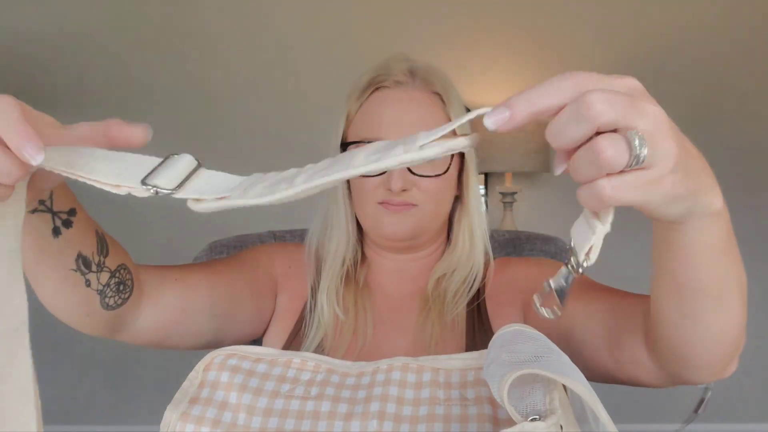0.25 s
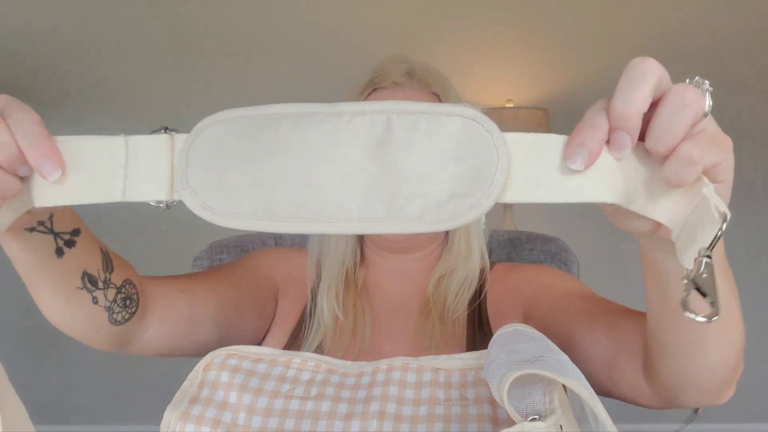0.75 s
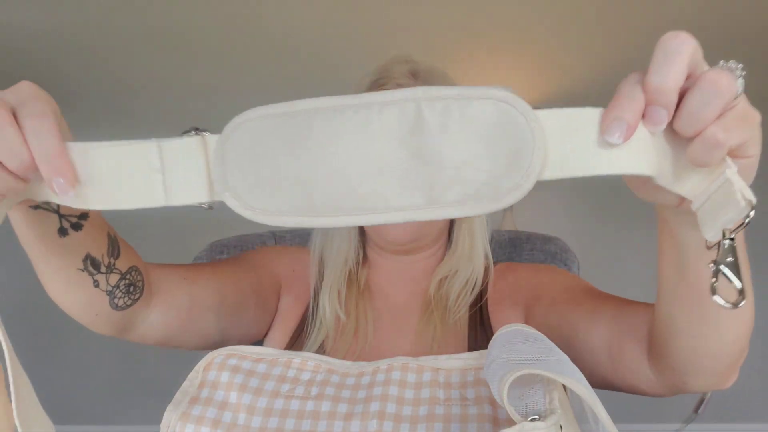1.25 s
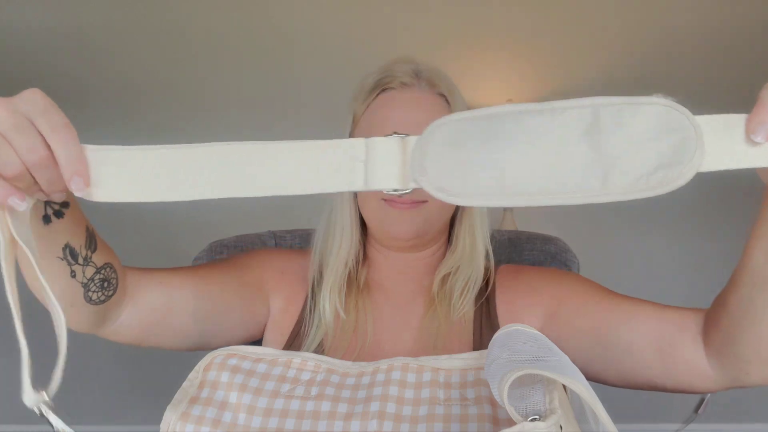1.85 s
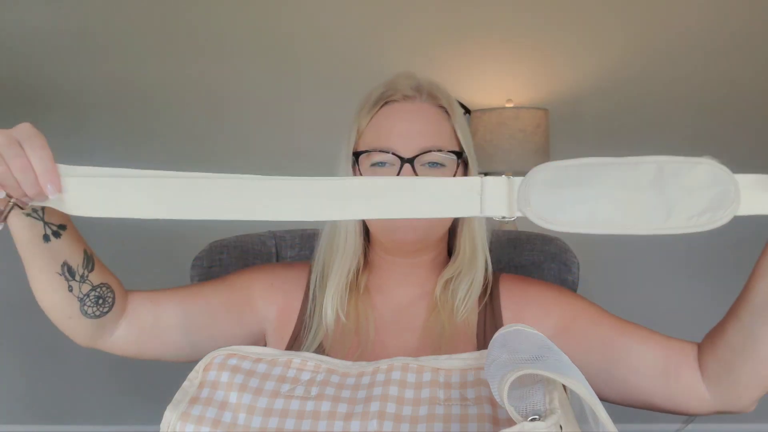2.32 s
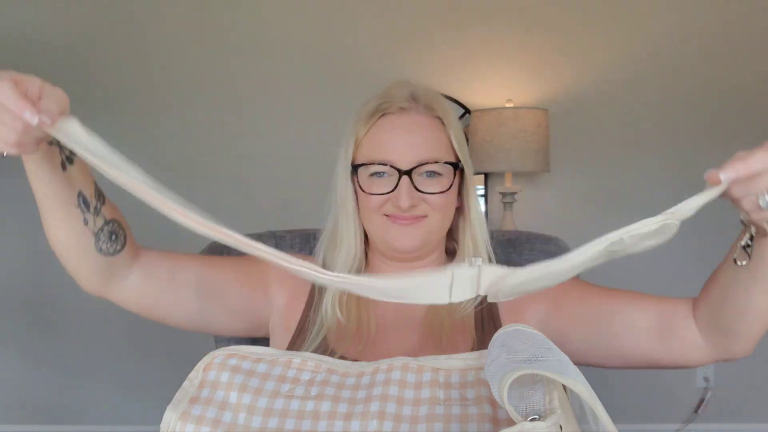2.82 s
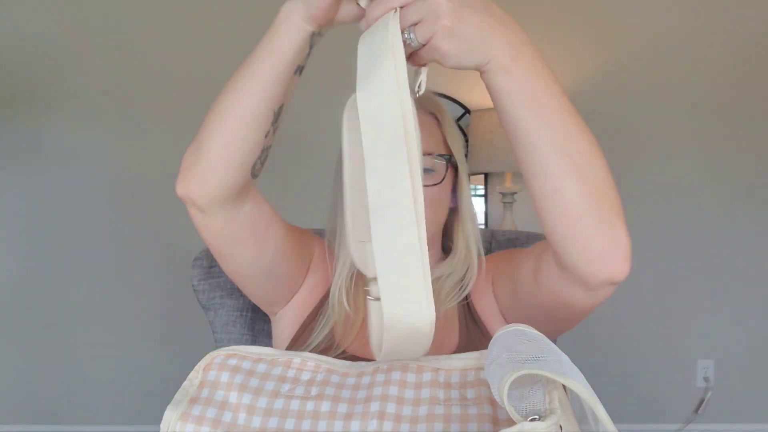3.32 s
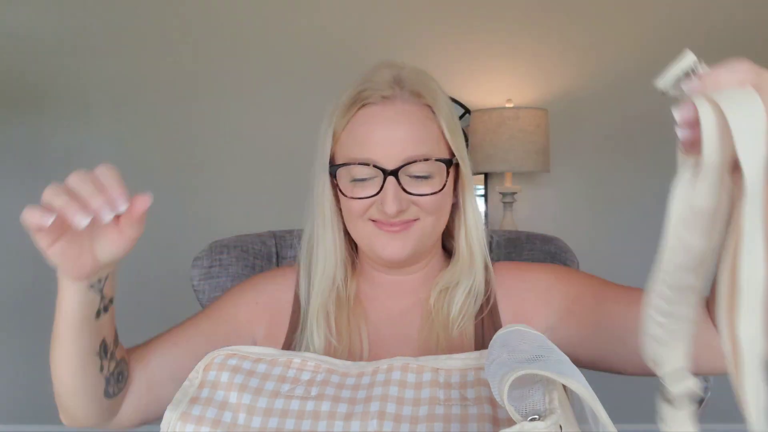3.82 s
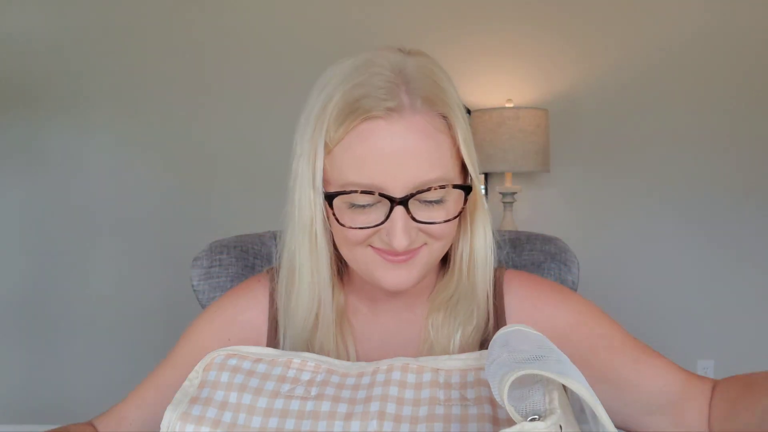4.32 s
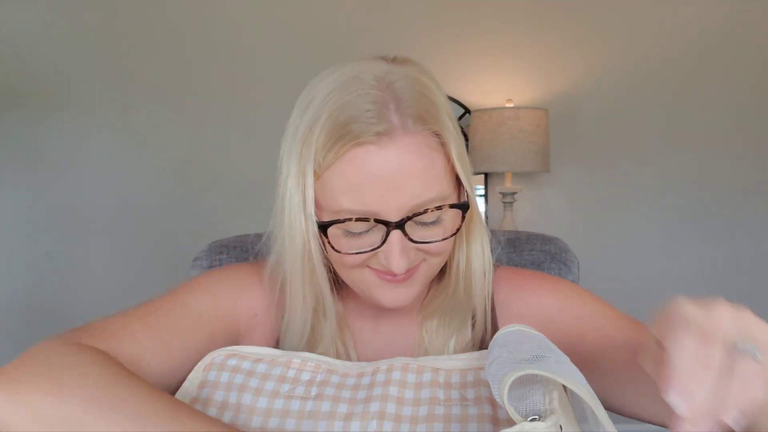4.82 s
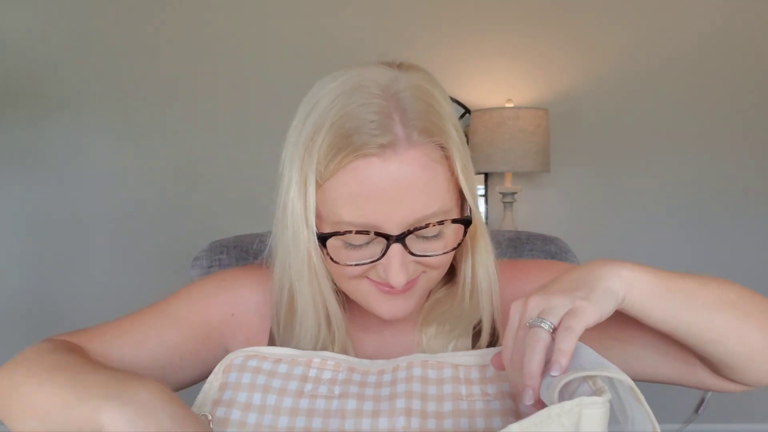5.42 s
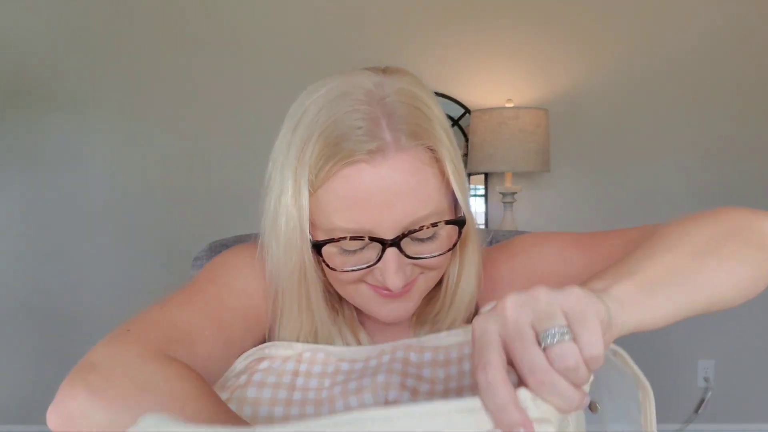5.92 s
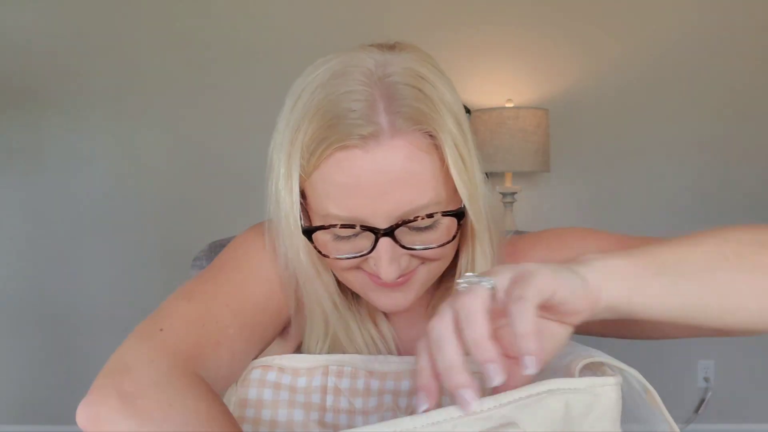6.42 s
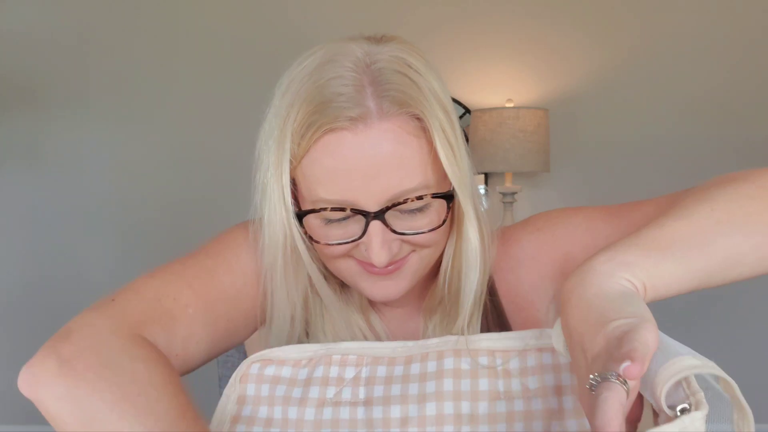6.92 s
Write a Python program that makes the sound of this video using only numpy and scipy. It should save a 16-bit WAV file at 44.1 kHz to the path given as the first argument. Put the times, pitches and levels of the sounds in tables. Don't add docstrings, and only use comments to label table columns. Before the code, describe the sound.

In a quiet room, a fabric strap slides with faint buckle ticks, drops with one violent metal-on-wood crack, then a bag is shoved about.

```python
import sys
import numpy as np
from scipy import signal
from scipy.fft import rfft, irfft, next_fast_len
from scipy.io import wavfile
from scipy.ndimage import map_coordinates

SR = 44100
rng = np.random.default_rng(int(sys.argv[2]) if len(sys.argv) > 2 else 0)


def magnitude_from_level(level_db):
    exponent = np.asarray(level_db, float) / 20
    return 10 ** exponent


def generate_wav(signal):
    frames = np.transpose(np.atleast_2d(signal))
    scaled = np.clip(frames, -1, 1) * 32767
    pcm = np.round(scaled).astype(np.int16)
    wavfile.write(sys.argv[1], SR, pcm)


N = 315315
SPAN = 32768
DETUNE = 0.012


def along(points, hz):
    f, v = np.transpose(points)
    return np.interp(np.log(hz + 1), np.log(f + 1), v)


def unit(x):
    return x / np.sqrt(np.mean(x ** 2) + 1e-20)


def causal(db):
    cepstrum = irfft(np.log(magnitude_from_level(np.maximum(db, -90))))
    half = cepstrum.shape[-1] // 2
    cepstrum[1:half] *= 2
    cepstrum[half + 1:] = 0
    return np.exp(rfft(cepstrum))


def pair(count, length):
    # f/Hz, correlation
    likeness = [(30, 0.94), (200, 0.9), (500, 0.86), (1000, 0.065), (2000, 0.049), (16000, .02)]
    hz = np.fft.rfftfreq(length, 1 / SR)
    angle = np.arccos(np.clip(along(likeness, hz), 0, 1)) / 2
    a, b = rfft(rng.standard_normal((2, count, length)))
    common, apart = a * np.cos(angle), b * np.sin(angle)
    return np.stack([common + apart, common - apart], axis=1)


def rush(spectrum, grain_db, grain_hz):
    length = next_fast_len(N)
    gain = magnitude_from_level(along(spectrum, np.fft.rfftfreq(length, 1 / SR)))
    noise = irfft(pair(count=1, length=length)[0] * gain, length)[:, :N]
    knots = np.minimum(rng.exponential(size=int(N * 1000 / SR)), 3.5)
    grain = np.interp(np.arange(N) * grain_hz / SR, np.arange(len(knots)), knots)
    return unit(noise * magnitude_from_level(grain_db * grain))


def strokes(rows):
    t = np.arange(N) / SR
    power = 0
    for s, db, swell, hold, fade in rows:
        rise = 20 * np.maximum(s - t, 0) / max(swell, 0.002)
        fall = 20 * np.maximum(t - s - hold, 0) / max(fade, 0.002)
        power = power + magnitude_from_level(db - rise - fall) ** 2
    return 10 * np.log10(power + 1e-14)


def crumpled(x, modes, depth_db, bins, frames, board_db):
    hz, _, z = signal.stft(x, SR, nperseg=512)
    grid = np.meshgrid(np.arange(len(hz)) / bins, np.arange(z.shape[2]) / frames, indexing="ij")
    patches = map_coordinates(rng.standard_normal(z.shape[1:]), grid, order=1)
    board = 1 + sum(magnitude_from_level(db + board_db) / (1 + ((hz - centre) / max(width, 60)) ** 2)
                    for centre, width, db in modes)
    return unit(signal.istft(z * board[:, None] * magnitude_from_level(depth_db * patches), nperseg=512)[1][:, :N])


def place(times, sounds, pan_db, lag_s, wet_db, size=SPAN):
    # f/Hz, t60/s
    wall_decay = [(100, 0.64), (500, 0.68), (2000, 0.66), (6000, 0.56), (9000, .4), (14000, 0.28)]
    hz = np.fft.rfftfreq(size, 1 / SR)
    band, t, z = signal.stft(irfft(pair(count=len(times), length=size)), SR, nperseg=256)
    swell = 1 - np.exp(-t / 0.0013)
    decay = magnitude_from_level(-60 * t / along(wall_decay, band)[:, None])
    tails = signal.istft(z * swell * decay, SR, nperseg=256)[1][..., :size]
    tails /= np.linalg.norm(tails, axis=-1, keepdims=True)
    side = np.array([[0.5], [-0.5]])
    out = np.zeros((2, N + size))
    for s, sound, pan, tail in zip(times, sounds, pan_db, tails):
        delay = np.exp(-2j * np.pi * hz * (0.000998 + side * lag_s))
        direct = magnitude_from_level(side * np.clip(pan, -8, 8)) * delay
        heard = irfft(rfft(sound, size) * (direct + magnitude_from_level(wet_db) * rfft(tail)))
        out[:, round((s - 0.001) * SR):][:, :size] += heard
    return out[:, :N]


def blow(colour, rise, t60, even, push=0):
    t = np.arange(SPAN // 4) / SR
    shape = (1 - np.exp(-t / rise)) * magnitude_from_level(-60 * t / max(t60, 0.002))
    z = rfft((push + rng.standard_normal(len(t))) * shape)
    burst = irfft(z / np.abs(z) ** even) * shape ** (even / 2)
    x = irfft(rfft(burst) * colour)
    return x / np.abs(x).max()


def ringing(modes, scatter_db):
    t = np.arange(SPAN // 2) / SR
    out = 0
    for hz, db, t60 in modes:
        decay = magnitude_from_level(db + scatter_db * rng.normal() - 60 * t / t60)
        out = out + decay * (1 - np.exp(-t * hz / 2.3)) * np.sin(2 * np.pi * hz * t)
    return out


def drops():
    # t/s, peak level/dB, brightness/dB, left-right/dB, deep ring/dB
    landings = [
        (4.686, -8, -0.5, -1, 3),
        (4.7328, -2.5, 5, -3, -3.5),
        (4.735, 0.5, 1.5, 2.5, -6),
        (4.742, -19.5, 2.5, -0.5, 6),
        (4.7521, -22, 6, -2.5, 1),
        (4.77, -22.5, 4.5, -8, -5.5),
        (4.806, -20.5, -7, -6, 3.5),
        (4.821, -36, -13, -7, 3),
    ]
    # f/Hz, level/dB per Hz
    crack_colour = [(60, -42.5), (150, -9), (330, -7.5), (720, -0.5), (1050, -6), (1300, -0.5), (1650, -4),
                    (2400, -3), (3400, -5), (4200, -8.5), (5900, -16), (6500, -41.5), (10500, -41.5),
                    (14000, -34.5)]
    # f/Hz, level/dB, t60/s
    desk_ring = [(167, -9, 0.12), (370.2, -12.5, 0.091), (545, -3.5, 0.065), (675, -10, 0.069),
                 (982, -7.5, 0.073), (1262, -5.5, 0.061), (1338, -16.5, 0.14), (2020, -20, 0.074),
                 (2174, -8, .07), (2425, -11.5, 0.047), (2558, -6, 0.044), (2806, -3.5, 0.047),
                 (3140, -12.5, 0.065), (4205, -11, 0.073)]
    f = np.fft.rfftfreq(SPAN // 4, 1 / SR)
    s, peak_db, bright_db, pan_db, deep_db = np.transpose(landings)
    sounds = []
    for db, bright, deep in zip(peak_db, bright_db, deep_db):
        modes = [(hz * (1 + DETUNE / 4 * rng.normal()), g + deep * (hz < 450), t60)
                 for hz, g, t60 in desk_ring]
        x = ringing(modes, scatter_db=1.5) / 4
        tilt = bright * np.log2(f / 2000 + 0.16)
        crack = blow(causal(along(crack_colour, f) + tilt), rise=0.00041, t60=0.0045, even=1.0)
        x[:len(crack)] += crack
        sounds.append(magnitude_from_level(db - 2.0) * x)
    return place(s, sounds, pan_db, lag_s=0.0003, wet_db=-2.5)


def knocks():
    # t/s, peak level/dB, brightness/dB, left-right/dB
    blows = [(0.07, -48.5, -10, -5.5), (0.09, -17, -14.5, 4), (0.12, -26.5, -22, 1),
             (0.214, -23.5, -20, -2.5), (0.255, -24, -16.5, 7.5), (.274, -32.5, -18, -10),
             (0.425, -38, -25, -2), (0.501, -49, -26.5, 25), (4.354, -57, -18, -1), (5.494, -53, 21, -8),
             (6.286, -37.5, -2, 11), (6.307, -35, -17, 5), (6.325, -36, -1, -4), (6.359, -35, 19, 1),
             (6.835, -43, -13, -2), (6.868, -45.5, -14, 0), (6.907, -39.5, -12, 1), (7.005, -38, -8, 0),
             (7.049, -50, -20, -3)]
    # f/Hz, width/Hz, level/dB
    desk_modes = [(375, 25.3, -0.5), (558, 25, -3.5), (655, 41.6, -9.5), (935, 56, -2.5), (1160, 54, -5.5),
                  (1379, 71, -5.5), (2010, 99, -22.5), (2310, 43, -23.5), (2875, 610, -31),
                  (3680, 45, -11.5), (4180, 130, -17.5), (5260, 550, -15.5)]
    f = np.fft.rfftfreq(SPAN // 4, 1 / SR)
    s, peak_db, bright_db, pan_db = np.transpose(blows)
    padded = 1 / (1 + 1j * f / 2700) ** 3
    sounds = []
    for db, bright in zip(peak_db, bright_db):
        wood = 0
        for k, (hz, w, g) in enumerate(desk_modes):
            c = hz * (1 + DETUNE * rng.normal())
            lift = (bright + 18) * np.clip(np.log2(c / 900), -0.5, 1.2)
            gain = (-1) ** k * magnitude_from_level(g + 1.5 * rng.normal() + lift)
            wood = wood + gain * 1j * f * w / (c * c - f * f + 1j * f * w)
        sounds.append(magnitude_from_level(db + 2.5) * blow(wood * padded, rise=0.00016, t60=0.0014, even=1.0, push=2.5))
    return place(s + 0.0015, sounds, pan_db, lag_s=0.00005, wet_db=-13)


def bumps():
    # t/s, peak level/dB, f/Hz, t60/s, left-right/dB
    thuds = [(0.094, -36, 94, 0.14, 2), (0.43, -53, 388.6, .06, 5), (4.6097, -45, 560, .022, 2),
             (6.946, -34, 436, 0.064, 0), (7.076, -53, 332.6, 0.016, -4), (0.501, -39, 393, 0.035, -6),
             (2.338, -57.5, 1900, 0.046, -6), (4.736, -37.5, 91, 0.32, 3), (5.492, -26, 305, 0.021, 1),
             (5.643, -51.5, 478, 0.071, 0.5), (5.84, -39, 232, 0.032, 1), (6.31, -59, 405, 0.052, -0.5),
             (6.353, -24, 145, 0.044, 5), (6.598, -36, 327, 0.041, 0), (6.618, -34.5, 523, 0.024, 4),
             (6.684, -41, 141, 0.046, 1), (6.76, -32, 473, 0.031, 2), (6.936, -47, 510, 0.13, 9),
             (6.962, -41.5, 464, 0.16, -8), (7, -33.5, 360, 0.07, -3), (7.001, -23.5, 79, 0.036, 0),
             (7.019, -39, 377, 0.16, -5), (7.049, -32, 310, 0.038, -12)]
    s, peak_db, pitch_hz, t60, pan_db = np.transpose(thuds)
    sounds = []
    for db, hz, decay in zip(peak_db, pitch_hz, np.maximum(t60, 0.015)):
        modes = [(hz, db + 2.0, decay), (hz * 1.9, db - 6, decay * 0.46), (75, db - 9.0, 0.07)]
        sounds.append(ringing(modes, scatter_db=6.5))
    return place(s, sounds, pan_db, lag_s=0.00002, wet_db=-13)


def clicks(rows, t60, top_db, wet_db):
    f = np.fft.rfftfreq(SPAN // 4, 1 / SR)
    s, peak_db, centre_hz, pan_db, sparkle_db = np.transpose(rows)
    sounds = []
    for db, hz, sparkle in zip(peak_db, centre_hz, sparkle_db):
        top = top_db + sparkle
        shape = [(900, -50), (1900, -24), (hz * 0.6, -19), (hz * 0.88, -8), (hz, 0), (hz * 1.1, -8),
                 (9600, top + 0.5), (11200, top + 0.532), (12200, top - 7.5),
                 (13300, top - 1.5), (15800, top - 7.5)]
        sounds.append(magnitude_from_level(db + 6.0) * blow(causal(along(shape, f)), rise=0.0023, t60=t60, even=0.32))
    return place(s, sounds, pan_db, lag_s=-0.00014, wet_db=wet_db, size=SPAN // 2)


def ticks():
    # t/s, peak level/dB, f/Hz, left-right/dB, sparkle/dB
    taps = [(0.0745, -53, 7600, -1, -3), (0.486, -61, 7850, -4, 0), (0.5342, -52.5, 7940, 2, 5),
            (0.623, -55.5, 7950, 8, 2), (0.85, -63.5, 7820, -8, 2), (0.96, -70, 7980, 2, 13),
            (1.7485, -48.5, 5760, -6, 3), (1.915, -55, 7400, -3.5, 0.5), (2.285, -57.5, 7500, -5.5, -3),
            (2.3395, -49.5, 5490, -5, 7.5), (2.8014, -57, 5500, 8, 2), (3.186, -64.5, 7600, -3, -6),
            (3.4456, -47, 8700, -5, 2), (3.4525, -48.5, 7800, 9, 3.5), (3.5055, -59, 7820, -1.5, 0),
            (3.5384, -55.5, 5710, 2.5, 0), (3.6845, -56.5, 4670, 4, -5), (3.7217, -57, 4590, 3, 5)]
    return clicks(taps, t60=0.012, top_db=-14, wet_db=-2.5)


def nicks():
    # t/s, peak level/dB, f/Hz, left-right/dB, sparkle/dB
    fittings = [(4.7218, -34.5, 8000, 2, -8), (4.7321, -20.5, 5570, 0, -3.5), (5.1544, -68, 7900, 6, 6),
                (5.4507, -59, 7640, -8, 2), (5.4742, -55.5, 7700, -8, 6), (5.507, -54, 7200, 3, 2),
                (5.5416, -67, 6640, 7.5, 0), (5.5758, -64.5, 7850, -10, 9), (5.6655, -71, 7650, -4, 0),
                (5.909, -43.5, 7300, 8, 1), (5.9215, -48, 5100, 1.5, -9), (6.358, -64, 5460, 9, 2),
                (6.9097, -44, 4970, 5, 10), (6.996, -42, 4430, 8, 0)]
    return clicks(fittings, t60=0.011, top_db=-8.5, wet_db=-3.5)


def clinks():
    # t/s, peak level/dB, f/Hz, left-right/dB, sparkle/dB
    contacts = [(0.3197, -39.5, 7400, 9, -6), (.347, -51, 7500, 10, 0), (.447, -53, 4600, -12, 3),
                (1.5282, -59, 5700, -11, 3), (2.3383, -41.5, 7000, -9, 3.5), (2.705, -64, 7260, 6, 4),
                (2.775, -62.5, 7600, -1, -3), (2.7891, -54.5, 7200, 8, -3), (3.0918, -58, 7900, 6, -1),
                (3.7428, -50, 8000, -0.5, 8), (3.8439, -61, 8000, -6, -4), (4.349, -60, 8060, -5, 4)]
    return clicks(contacts, t60=0.0076, top_db=-4.5, wet_db=-7)


def hook():
    # t/s, first mode level/dB, then second, third and fifth mode against the first/dB
    touches = [
        (3.531, -91, 24, 9, -4),
        (3.539, -75.5, 14, -3, -4),
        (3.5473, -85, 21, -1, -4),
        (3.685, -77, -3, -10, -12),
        (3.7199, -61, -14, -15, -14),
        (3.734, -68, -3, -11, -3),
        (3.7426, -75.5, 12, 7, 12),
        (3.844, -62.5, -21, -16, -6),
        (3.862, -80.5, 2, 7, -7),
    ]
    # f/Hz, t60/s
    hook_modes = [(4095, .11), (5750, .1), (7918, .11), (9985, .06), (13120, .065)]
    s, first_db, second, third, fifth = np.transpose(touches)
    levels = first_db + np.array([0 * s, second, third, fifth - 8, fifth])
    sounds = []
    for touch in levels.T:
        modes = [(hz * ratio, db + lift, t60) for (hz, t60), db in zip(hook_modes, touch)
                 for ratio, lift in [(1, 5.5), (1.008, 2.5)]]
        sounds.append(ringing(modes, scatter_db=2.5))
    return place(s, sounds, 7.5 + 0 * s, lag_s=0.0001, wet_db=-11)


def pings():
    # t/s, peak level/dB, f/Hz, t60/s
    singing = [(.093, -16.5, 347, 0.07), (.093, -42.5, 2354, 0.095), (.093, -40, 3720, 0.065),
               (.093, -42.5, 4190, 0.075), (.093, -48, 5060, .06), (.1, -29.5, 542, .17),
               (.257, -23.5, 391, 0.057), (.257, -52.5, 3190, 0.12), (.275, -33, 564, 0.17),
               (3.539, -62, 9985, 0.098), (4.743, -22, 365, .08), (4.801, -31.5, 356.5, 0.1),
               (0.3211, -47.5, 7420, 0.074), (0.3215, -46, 11000, 0.056), (.347, -67, 7900, .06),
               (.432, -75.5, 11000, 0.032), (.487, -60, 7500, 0.025), (.534, -63, 4900, .04),
               (0.635, -61, 11000, 0.043), (1.749, -63.5, 4890, 0.079), (1.749, -56.5, 8030, 0.083),
               (1.749, -67.5, 10900, .05), (2.337, -56, 6790, 0.088), (2.339, -50, 11700, 0.069),
               (2.339, -58.5, 13200, 0.068), (2.338, -54.5, 8100, 0.095), (2.705, -65, 11300, 0.052),
               (3.453, -54, 7270, .1), (3.453, -61.5, 7600, .1), (3.452, -51, 11270, 0.066),
               (3.453, -60, 13100, .07), (3.685, -58, 4450, 0.032), (4.688, -27, 1263, 0.15),
               (4.736, -27.5, 1262, 0.16), (4.738, -21.5, 167, 0.14), (5.125, -57, 9140, 0.062),
               (5.125, -69.5, 7950, 0.029), (5.163, -58, 9700, 0.032), (5.394, -64.5, 7800, .03),
               (5.451, -64, 3420, 0.043), (5.494, -55, 3450, 0.032), (5.541, -64.5, 6760, 0.1),
               (5.665, -65, 7720, 0.059), (6.29, -33.5, 2556, .04), (6.29, -37, 1240, 0.054),
               (6.306, -31, 1386, 0.07), (6.311, -35, 1166, 0.083), (6.371, -42.5, 1726, 0.074),
               (6.909, -38, 1080, 0.028)]
    s, peak_db, pitch_hz, t60 = np.transpose(singing)
    sounds = [ringing([(hz, db, decay), (hz * 1.013, db - 5, decay * 0.7)], scatter_db=1)
              for db, hz, decay in zip(peak_db, pitch_hz, np.maximum(t60, 0.015))]
    return place(s, sounds, 0 * s, lag_s=0.00003, wet_db=-7.5, size=SPAN // 2)


def strap():
    # t/s at full strength, level/dB, swell/s, hold/s,
    # fade/s
    slides = [(0.09, -57, 0.058, 0.014, 0.22), (0.3, -70, 0.1, 0.31, 0.75), (1.3, -72.5, 0.12, 0.12, 0.13),
              (1.66, -69.5, 0.24, 0.29, 0.15), (1.95, -68, .15, 0.45, 0.08),
              (2.76, -70.5, 0.26, 0.11, 0.19), (3.1, -76, 0.11, 0.35, 0.28), (4.3, -82.5, 0.077, .05, .15),
              (4.54, -67, 0.19, 0.29, 0.099), (4.86, -66, 0.077, 0.31, 0.32),
              (5.44, -68, 0.32, 0.076, 0.32), (5.87, -57.5, 0.063, 0.051, 0.4),
              (6.3, -56, 0.11, 0.0073, 0.23), (6.64, -58.5, 0.21, 0.19, 0.092),
              (7.0, -56.5, 0.25, 0.014, 0.2)]
    # f/Hz, level/dB per Hz
    hiss_colour = [(900, -32), (1600, -1.5), (2300, 0.5), (4300, 0.5), (7500, -1), (8400, -1.5),
                   (9500, -4.5), (11000, -35.5)]
    # f/Hz, level/dB per Hz
    fizz_colour = [(8500, -38.5), (9500, -1), (11500, 2.5), (15500, 5), (16000, -38.5)]
    # f/Hz, level/dB per Hz
    rub_colour = [(100, -30.5), (250, 4), (500, -9.5), (1200, -17), (2500, -43.5)]
    hiss_db = 20 * np.log10(np.hypot(magnitude_from_level(strokes(slides)), magnitude_from_level(-85)))
    fizz_db = -75 + 0.88 * (hiss_db + 66.5)
    rub_db = -72.5 + 0.7 * (hiss_db + 70.0)
    hiss = magnitude_from_level(hiss_db) * rush(hiss_colour, grain_db=1.5, grain_hz=132)
    fizz = magnitude_from_level(fizz_db) * rush(fizz_colour, grain_db=2.5, grain_hz=195)
    rub = magnitude_from_level(rub_db) * rush(rub_colour, grain_db=4.0, grain_hz=39.6)
    return hiss + fizz + rub


def bag():
    # t/s at full strength, level/dB, swell/s, hold/s, fade/s
    drags = [
        (5.3, -70, 0.21, 0.18, 0.17),
        (5.64, -65, 0.0097, 0.0028, 0.077),
        (5.85, -61.5, 0.063, 0.076, 0.34),
        (6.29, -36, 0.026, 0.02, 0.12),
        (6.36, -48.5, 0.13, 0.0046, 0.25),
        (6.69, -59, 0.21, 0.007, 0.041),
        (6.95, -42.5, 0.23, 0.11, 0.11),
    ]
    # t/s at full strength, level/dB, swell/s, hold/s, fade/s
    trails = [
        (4.204, -70.5, 0.0075, 0.069, 0.045),
        (4.3, -66.5, 0.059, 0.063, 0.058),
    ]
    # f/Hz, level/dB per Hz
    scrape_colour = [(290, -32.5), (480, 5), (752, -6), (1250, -2.5), (1480, -7), (3530, -8.5), (7000, -30),
                     (9100, -66.5), (15400, -120)]
    # f/Hz, width/Hz, level/dB
    board_modes = [(970, 21, 1.5), (1145, 34, -11.5), (1333, 31, -1.5), (1690, 68, -2), (1840, 43, -6),
                   (2543, 52, 0.5), (3435, 92, -21)]
    # f/Hz, level/dB per Hz
    crackle_colour = [(500, -18), (1200, -0.5), (3000, 0.5), (6500, -22), (9500, -18)]
    # f/Hz, level/dB per Hz
    thrum_colour = [(18, -53), (30, -10.5), (75, -5.5), (232, -7), (376, -6.5), (414, -12.5), (800, -21),
                    (1040, -28.5), (1760, -120)]
    scrape = crumpled(rush(scrape_colour, grain_db=-2.0, grain_hz=119), board_modes,
                      depth_db=2.5, bins=3.6, frames=3, board_db=1.0)
    scrape_db = strokes(drags)
    crackle_db = -71 + 0.8 * (scrape_db + 62)
    thrum_db = -61 + 0.53 * (scrape_db + 63.0)
    crackle = magnitude_from_level(crackle_db) * rush(crackle_colour, grain_db=9.5, grain_hz=389)
    thrum = magnitude_from_level(thrum_db) * rush(thrum_colour, grain_db=3.2, grain_hz=28)
    return np.hypot(magnitude_from_level(scrape_db), magnitude_from_level(strokes(trails))) * scrape + crackle + thrum


def strap_end():
    # t/s at full strength, level/dB, swell/s, hold/s, fade/s
    rattles = [
        (0.093, -33, 0.0076, 0.021, 0.11),
        (0.27, -42, 0.11, 0.021, 0.14),
        (0.447, -50.5, 0.0061, 0.006, 0.17),
        (6.292, -42.5, 0.0094, 0.045, 0.06),
        (6.36, -65, .02, 0.0091, 0.12),
    ]
    # t/s at full strength, level/dB, swell/s, hold/s, fade/s
    flick_strokes = [
        (.448, -66.5, 0.0035, 0.04, 0.14),
        (4.25, -65.5, .012, 0.057, 0.11),
        (4.684, -36, 0.012, .001, 0.003),
        (5.83, -68, .008, 0.032, 0.33),
        (6.256, -63, 0.0037, 0.0045, 0.039),
        (6.37, -52, .008, .01, 0.13),
        (6.79, -58, .01, 0.017, 0.048),
        (6.865, -70, .006, .01, .05),
    ]
    # f/Hz, level/dB per Hz
    rasp_colour = [(500, -21), (900, 5.5), (1800, -1), (3200, -9.5), (5000, -13), (8000, -30)]
    # f/Hz, level/dB per Hz
    flick_colour = [(1200, -17.5), (1900, -2), (2800, -4.5), (4400, -8), (7000, -26.5)]
    # f/Hz, width/Hz, level/dB
    rim_modes = [(372, 71, -1.5), (557, 68, -5.5), (680, 60, 4.5), (970, 68, -15.5), (1140, 60, 0),
                 (1350, 95, -1), (1900, 70, -2.5), (2390, 160, -3.5), (3080, 69, -5.5)]
    rasp = crumpled(rush(rasp_colour, grain_db=-0.8, grain_hz=99), rim_modes,
                    depth_db=4.5, bins=2.0, frames=3.786, board_db=12.5)
    flick = crumpled(rush(flick_colour, grain_db=2.0, grain_hz=143), rim_modes,
                     depth_db=2.5, bins=1.6, frames=2.5, board_db=-2)
    return magnitude_from_level(strokes(rattles) + 2.5) * rasp + magnitude_from_level(strokes(flick_strokes)) * flick


def squeak():
    # t/s at full strength, level/dB, swell/s, hold/s, fade/s
    pulls = [
        (4.27, -71, 0.078, 0.025, 0.13),
    ]
    hz = 2996 - 300 * (np.arange(N) / SR - pulls[0][0])
    flutter = np.interp(np.arange(N) * 90 / SR, np.arange(1000), rng.standard_normal(1000))
    return magnitude_from_level(strokes(pulls) + 1.8 * flutter) * np.sin(2 * np.pi * np.cumsum(hz) / SR)


def room_tone():
    # f/Hz, level/dB per Hz
    air_colour = [(12, -51), (20, 2), (37, 0), (107, 2), (182, -10), (210, -0.5), (241, -7.5), (337, -9.5),
                  (388, -19), (542, -15.5), (949, -27), (2080, -27), (3160, -27.5), (4540, -38),
                  (16000, -61.5)]
    return magnitude_from_level(-61.5) * rush(air_colour, grain_db=-0.6, grain_hz=3)


def scene():
    struck = drops() + knocks() + bumps()
    metal = ticks() + nicks() + clinks() + hook() + pings()
    cloth = strap() + bag() + strap_end()
    return struck + metal + cloth + squeak() + room_tone()


def roll_off(x):
    return signal.sosfilt(signal.butter(12, 16650, fs=SR, output="sos"), x)


def record(dry):
    # f/Hz, level/dB
    mic_colour = [(20, -8.5), (100, -0.83), (8200, 2), (8900, -6), (10200, -2), (12000, 0.5), (15700, -1),
                  (16100, -69)]
    response = causal(along(mic_colour, np.fft.rfftfreq(N, 1 / SR)))
    coloured = irfft(rfft(dry) * response, N)
    rounded = coloured / (1 + coloured ** 4) ** (1 / 4)
    return roll_off(rounded)


dry = scene()
out = record(dry)
generate_wav(out)
```